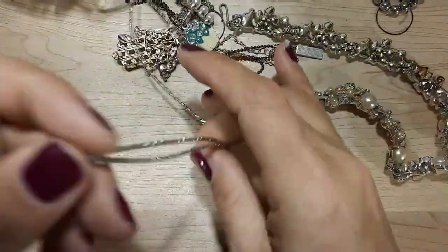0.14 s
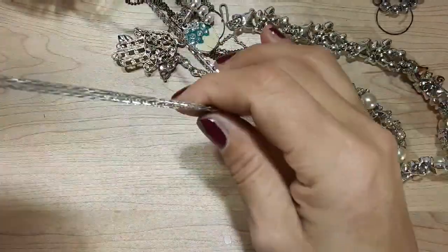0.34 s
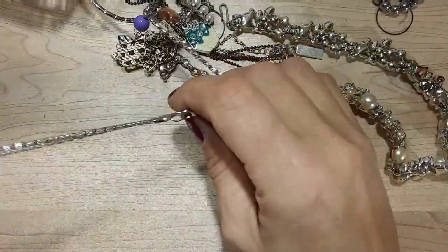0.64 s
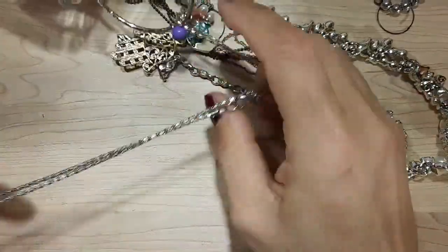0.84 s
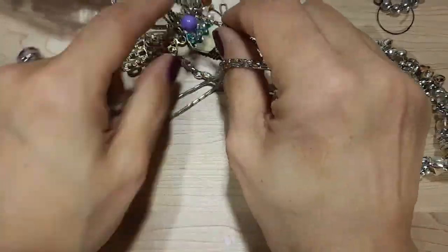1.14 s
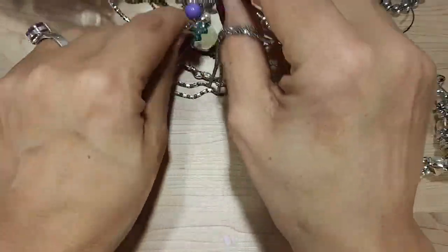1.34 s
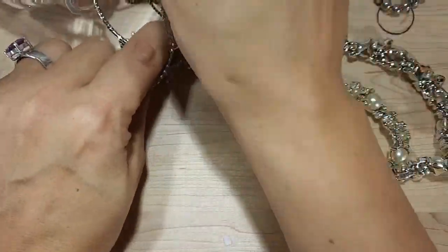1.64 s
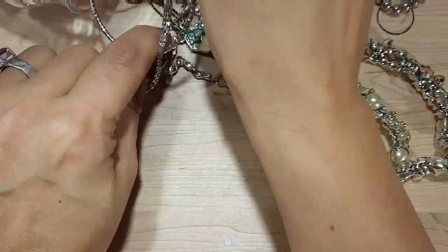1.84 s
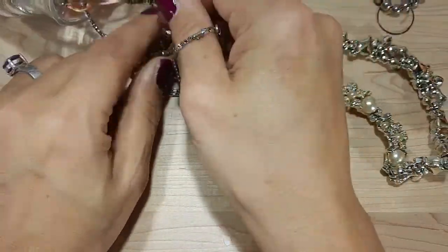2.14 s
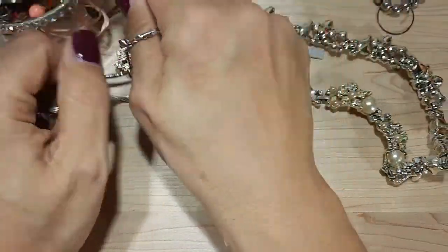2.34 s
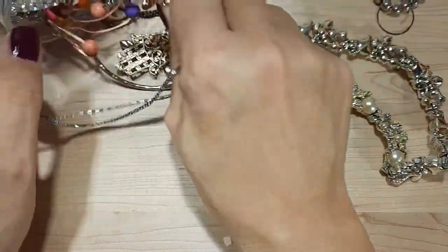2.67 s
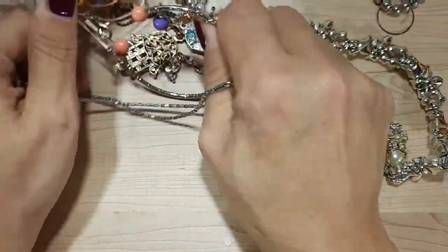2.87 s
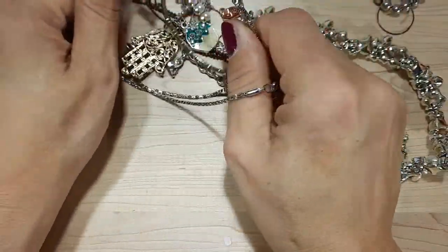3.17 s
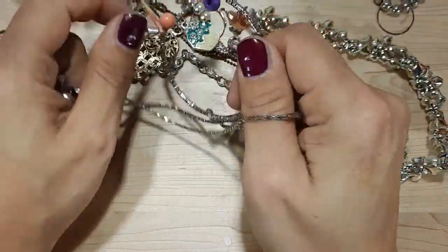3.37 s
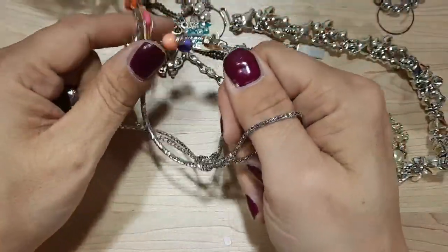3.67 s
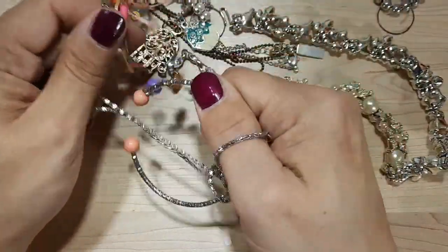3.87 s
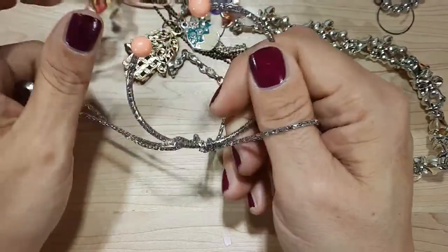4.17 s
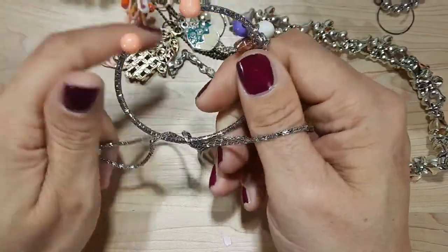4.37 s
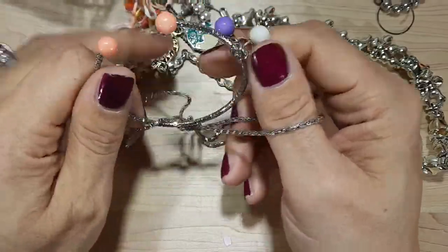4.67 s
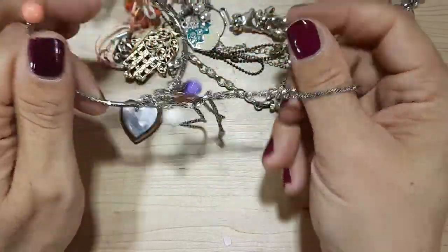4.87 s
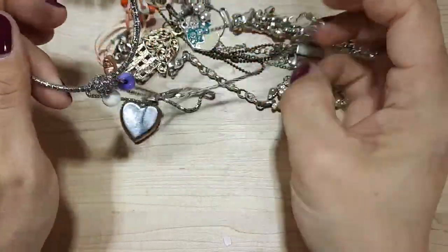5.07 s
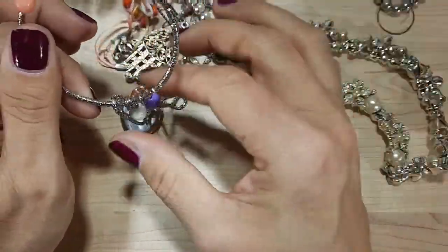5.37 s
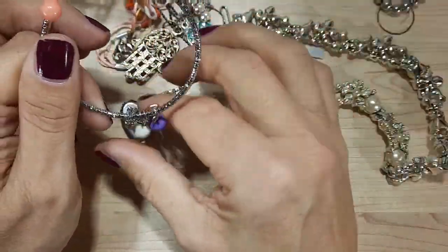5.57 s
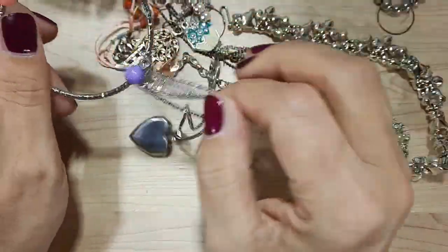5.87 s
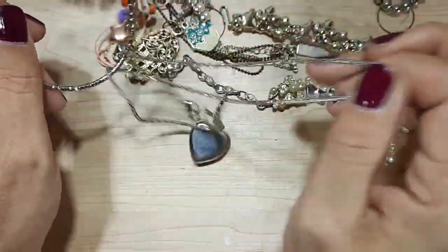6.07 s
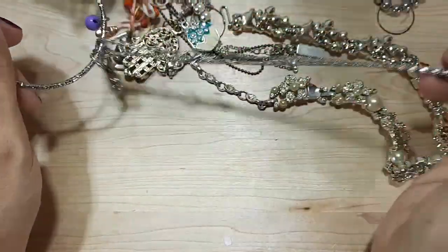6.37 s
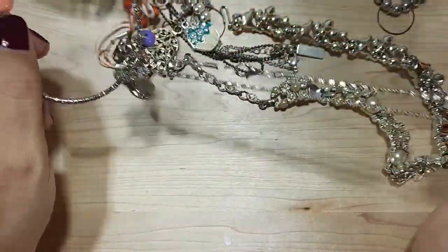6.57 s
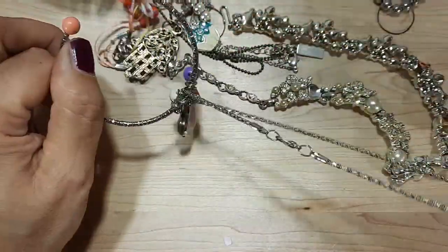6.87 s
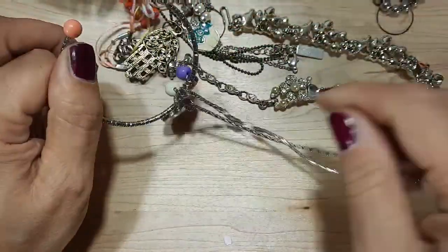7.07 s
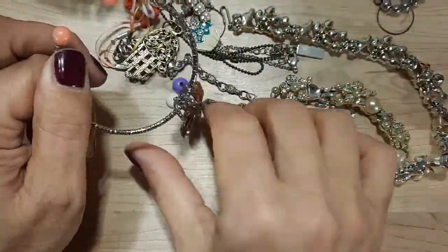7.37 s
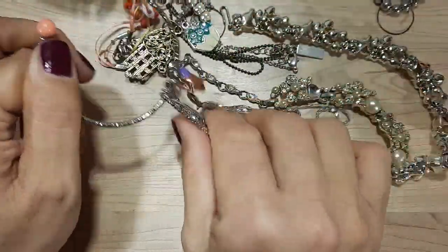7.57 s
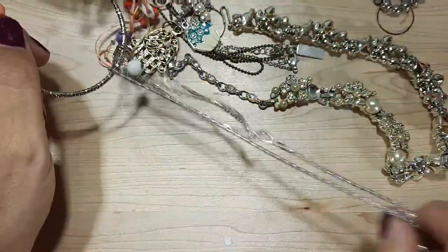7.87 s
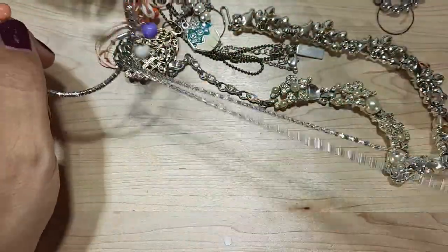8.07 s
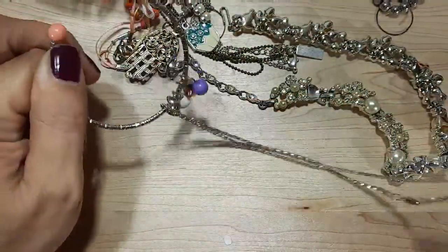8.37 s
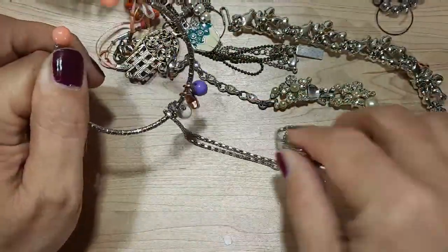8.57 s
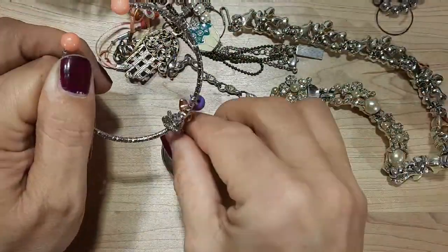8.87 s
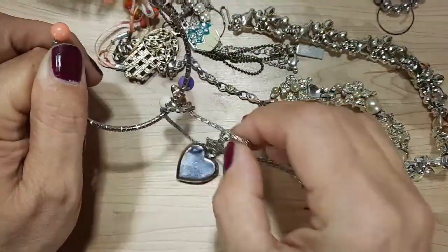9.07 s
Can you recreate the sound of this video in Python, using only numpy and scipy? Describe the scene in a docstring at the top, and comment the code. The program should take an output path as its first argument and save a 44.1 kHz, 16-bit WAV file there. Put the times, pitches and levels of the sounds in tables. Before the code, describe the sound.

Close, quiet jewelry untangling: dry ticking links, faint knocks on wood, and a bouncing metal pendant's rapid tinny clinks over a soft room hum.

```python
"""Links rustle over a quiet room hum, then flat pendants rattle in a heap: hands untangle thin chains.
Later a hollow locket comes free, bounces and rings; knuckles knock the wooden table, pieces squeak
and fine links snap. Clinks are decaying modes struck by noise; rustle is many tiny such ticks.
Knocks ring the table top, squeaks and snaps are filtered noise, and a short room tail follows all
near sounds. The sound is close, with the deep bass and highest treble trimmed."""
import sys
import numpy as np
from scipy import signal
from scipy.fft import rfft, irfft
from scipy.io import wavfile
from scipy.ndimage import uniform_filter1d

SR = 44100
rng = np.random.default_rng(int(sys.argv[2]) if len(sys.argv) > 2 else 0)


def dump_mix(stems):
    """Bounce the given channels to the path in sys.argv[1] as a 16-bit WAV at rate SR."""
    frames = np.atleast_2d(stems).T  # one column per channel
    limited = np.clip(frames, -1, 1)  # hard clip at full scale
    pcm = np.round(limited * 32767).astype(np.int16)
    wavfile.write(sys.argv[1], SR, pcm)


N = 406910  # length in samples

# Steady air noise, spectral shape before levelling: pitch_hz, level_db (per Hz)
AIR_SHAPE = [(24, -38), (40, -4.5), (337, -20), (412, -30.5), (516, -17.5), (680, -29), (1680, -36),
             (16000, -41)]
AIR_DB = -76.5  # overall RMS level of the air noise
# Fuzzy hum bands: pitch_hz, width_hz (at half amplitude), level_db (RMS)
HUM_BANDS = [(130, 9, -78.5), (297.2, 36, -79), (492, 140, -86)]
# Tugs that set the links sliding: start_s (full motion), swell_s, hold_s, rustle_db,
# scrape_db (on the wood, over the rustle), fizz_db (finest links, over the rustle)
TUGS = [(-0.01, 0.079, 0.11, -63.5, -8.5, -1), (0.251, 0.069, 0.031, -58, -3, -3.5),
        (0.426, 0.012, 0.0066, -48.5, -6, -9), (0.493, 0.018, 0.014, -43.5, -3.5, -2),
        (0.554, 0.02, 0.019, -49.5, -6.5, 1), (0.664, 0.01, 0.044, -62, -19, -7),
        (0.838, 0.021, 0.048, -58.5, -2, -5), (0.996, 0.046, 0.14, -68, -0.5, -6),
        (1.265, 0.0047, 0.0081, -63, 1, -15), (1.417, 0.14, 0.25, -63, -4.5, -1),
        (1.58, 0.068, 0.07, -62.5, -4.5, 10), (2.056, 0.14, 0.016, -65.5, -11, 2.5),
        (2.171, 0.013, 0.095, -60, -1, 4.5), (2.428, 0.19, 0.095, -52, 0.5, -1.5),
        (2.626, 0.12, 0.19, -53, -3, 3), (3.032, 0.031, 0.067, -66, 5.5, 0),
        (3.191, 0.086, 0.079, -64.5, 1, -5), (3.399, 0.16, 0.016, -58, -14.5, 2.5),
        (3.593, 0.21, 0.034, -65, -9.5, 4), (3.675, 0.0083, 0.0043, -54.5, -11.5, 8.5),
        (3.77, 0.013, 0.019, -61, -15, 8.5), (3.899, 0.0084, 0.012, -62.5, -15.5, 5),
        (3.995, 0.019, 0.095, -66, -23, 6), (4.28, 0.073, 0.024, -72, -13, 15),
        (4.332, 0.0065, 0.035, -58.5, -5, 3), (4.773, 0.079, 0.17, -48.5, -8.5, 3),
        (5.249, 0.073, 0.024, -62, -6, 5), (5.856, 0.085, 0.063, -60.5, -14, 9),
        (5.963, .03, 0.039, -49, -15.5, -2), (6.152, 0.099, 0.15, -47.5, -11, -1.5),
        (6.382, 0.19, 0.12, -55.5, -7, 4), (6.582, 0.094, 0.071, -67.5, -2.5, 16),
        (6.792, 0.097, 0.058, -61.5, -44, 3), (7.261, 0.14, 0.0027, -56.5, -8.5, -2),
        (7.287, 0.037, 0.11, -76, 5.5, -1), (7.677, 0.038, 0.038, -59.5, -34, 11.5),
        (7.742, 0.18, 0.07, -58, -11.5, 5.5), (8.012, 0.28, 0.23, -74, -5, 16),
        (8.6, 0.34, 0.025, -66.5, -10.5, -2), (8.675, 0.0082, 0.14, -62.5, 5, 7.5),
        (8.8, 0.15, 0.029, -51.5, -28, -25), (9.045, 0.025, 0.093, -66, -37, -4.5),
        (9.147, 0.089, 0.029, -48, -19.5, 2)]
SWELL_DB = 26.5  # climb during a tug's swell
# Fall after a tug stops, one row each for rustle, scrape, fizz: fall_db_per_s
SETTLE_RATES = [
    [187],
    [159.5],
    [166.5],
]
# What the links brush: time_s, locket_share (0 = all heap, 1 = all locket)
BRUSHING = [(.15, .9), (.2, 0), (4.5, 0), (4.55, 1), (7.67, 1), (7.73, .25), (8.62, .2), (8.67, 1)]
# Ringing modes of the heap of pendants: pitch_hz, level_db (relative), t60_s
HEAP_MODES = [(2053, -4, 0.015), (4106, 1, 0.014), (5190, 5.5, 0.0076), (6325, -5, 0.016),
              (8370, -9.5, 0.016), (11420, -3.5, 0.016), (13750, 4, 0.03)]
# Ringing modes of the hollow locket: pitch_hz, level_db (relative), t60_s
LOCKET_MODES = [(2747, -15.5, 0.032), (3850, 4, 0.0046), (4913, 6, 0.012), (7650, -14, 0.026),
                (8230, -9.5, 0.016), (10680, -7, 0.011), (11440, -8.5, 0.022)]
# Extra locket mode, stronger against the wood: pitch_hz, level_db (at wood_db 0), t60_s
PRESSED_MODE = (4640, 7, 0.017)
# Ringing modes of the table top: pitch_hz, level_db (relative), t60_s
TABLE_MODES = [(127, -20, 0.11), (178.5, -5.5, 0.11), (264.7, -7, 0.085), (288, 1, 0.08), (329.6, 0, 0.059),
               (418, -1.5, 0.05), (622, 2, 0.033), (864, -8.5, 0.097)]
# Locket blows: start_s, level_db (middle-band peak), wood_db (low-band peak over the blow),
# sharp_db (top-band peak over the blow)
LOCKET_CLINKS = [(0.0653, -43, -26, -22), (4.5381, -50.5, -20, -0.5), (4.725, -20, -6.5, -6.5),
                 (4.7499, -15, -10.5, -7), (4.7725, -15, -9, -15.5), (4.806, -19, -9, -12),
                 (4.816, -18.5, -12, 0), (4.823, -17.5, -14.5, -6), (4.8387, -17.5, -17, -0.5),
                 (4.8535, -33, -12, -12), (4.865, -31, -2.5, -14), (4.8754, -18, -14.5, -3),
                 (4.9141, -18.5, -14.5, -5), (4.9392, -19, -15.5, -20), (5.2484, -32.5, -10, 7),
                 (5.8215, -41.5, -33, 1), (5.8726, -35.5, -19.5, 7.5), (5.9604, -28.5, -17.5, -26),
                 (6.0201, -37.5, -8.5, 7), (6.068, -43.5, -6, 16.5), (6.14, -33.5, -12.5, -6.5),
                 (6.1468, -15, -15, -6.5), (6.1544, -22.5, -11, 3), (6.1937, -16.5, -16, -1),
                 (6.2135, -19, -15.5, -17), (6.2462, -22.5, -10.5, -5), (6.2545, -18.5, -11, -27),
                 (6.2685, -24.5, -19, -15), (6.279, -24, -13.5, -11), (6.359, -27, -19, -6),
                 (6.3874, -30.5, -14.5, 11), (6.4288, -37.5, -6.5, -13), (6.4589, -33, -8, -23),
                 (6.4907, -30.5, -24, 8.5), (6.556, -31, -58, 1.5), (6.6027, -34.5, -47, 5),
                 (6.6235, -23.5, -45, 4), (6.6485, -21.5, -55, -9), (6.7336, -39, -52, -3),
                 (6.75, -40, -48, -7), (6.8326, -38.5, -47, -8), (6.847, -38.5, -42, -9),
                 (6.994, -42, -63, -6), (7.024, -47, -49, -8), (7.05, -47, -47, -8), (7.099, -48, -50, -2),
                 (7.154, -60.5, 3, -12), (7.199, -51, -8, 6.5), (7.25, -31, -32, -8.5),
                 (7.26, -35.5, -13, -1), (7.28, -41, -7, -8), (7.4773, -49.5, -53, 0),
                 (7.579, -52.5, -39.5, 8), (8.675, -36, 0, 2), (8.752, -33.5, 0, 5.5),
                 (8.807, -41, -17, -1), (8.8305, -36.5, -13.5, -14), (8.841, -30, -11, -9),
                 (8.7873, -23.5, -11.5, -7), (8.8198, -24, -14.5, -16), (9.0992, -40, -39, -7),
                 (9.148, -19, -21, -27), (9.168, -24, -14, -27)]
# Blows within the heap: start_s, level_db, wood_db, sharp_db (same meanings as for the locket)
HEAP_CLINKS = [(0.2893, -41, -3.5, 2), (0.4269, -33, -10, 0.5), (0.49, -24.5, -10, 6),
               (0.505, -30.5, -3, -10.5), (0.514, -23, -14.5, -1), (0.586, -31, -6, 7),
               (0.6662, -28.5, -13, -10), (0.8106, -41.5, -51, -22), (0.844, -25, -12, -3.5),
               (0.8874, -41.5, -4.5, -11), (1.265, -38.5, -12.5, -39), (1.6558, -36.5, 3.5, -2),
               (1.71, -44.5, -2.5, -23), (2.1864, -36.5, -8, 0), (2.353, -25, -6.5, -1.5),
               (2.3616, -26.5, -26, -5), (2.392, -30, -7, -12), (2.4235, -27, -14, -8.5),
               (2.6245, -34.5, -8, 2), (2.4174, -29.5, -15, -7), (2.4427, -25.5, -10.5, -1.5),
               (2.4508, -30, -7, -7.5), (2.4772, -22, -18, -13), (2.5132, -32.5, -2.5, -4),
               (2.59, -34, -11, -13), (2.6291, -25, -10.5, -2.5), (2.6452, -23, -27, -15),
               (2.672, -33.5, 1.5, -14), (2.6896, -24, -11.5, -5), (2.7054, -27, -32, 3),
               (2.9412, -39, -33, -10), (3.0377, -35.5, -1, 2), (3.1956, -29.5, -8, -44),
               (3.374, -34.5, -13.5, 1), (3.402, -41.5, -6.5, -3), (3.5967, -44.5, -15, -5),
               (3.6726, -29, -17.5, -8), (4.3326, -34, -9, -5), (4.3405, -35, -8.5, 0),
               (8.5365, -47.5, -15, 4), (8.563, -40, -14, -18)]
# Knuckles on the table top: start_s, level_db (peak)
KNOCKS = [(0.517, -35.5), (0.592, -41), (0.669, -41), (1.654, -22.5), (2.633, -38), (4.726, -38.5),
          (4.811, -40.5), (8.671, -43.5)]
# Pieces that drag and sing: start_s, length_s, pitch_hz, level_db (RMS before the fades)
SQUEAKS = [(1.26, 0.032, 2350, -57.5), (1.319, 0.44, 2010, -73), (1.99, 0.14, 2020, -69),
           (5.031, 0.22, 1750, -76)]
SQUEAK_WIDTH = 0.093  # share of the pitch on each side
# Fine links snapping past one another: start_s, level_db (peak)
SNAPS = [(3.0143, -32), (3.2534, -33), (3.679, -35), (3.7184, -42), (3.919, -26.5), (3.9967, -39),
         (7.8735, -34.5), (8.1499, -37.5), (8.2432, -42), (8.3247, -35.5)]
# Decay of the room tail: pitch_hz, t60_s
ROOM_DECAY = [(200, 0.28), (1000, 0.19), (4000, 0.16), (14000, 0.014)]
LOW_HZ, HIGH_HZ, EDGE_HZ = 2500, 9000, 15850  # two band splits, then the upper limit of the sound


def gain_of(db):
    """Decibels to amplitude."""
    return 10 ** (np.asarray(db) / 20)


def evened(x):
    """Level a sound to an RMS of one."""
    return x / np.sqrt(np.mean(x ** 2) + 1e-20)


def read(points, hz):
    """Read a curve of frequency on a logarithmic scale."""
    f, value = np.transpose(points)
    return np.interp(np.log(hz + 1), np.log(f + 1), value)


def add(mix, start_s, sound):
    """Lay a sound into the mix in place, cut off at the end."""
    part = mix[round(start_s * SR):][:len(sound)]
    part += sound[:len(part)]


def band(x, lo_hz, hi_hz):
    """Keep one frequency band."""
    sos = signal.butter(4, [lo_hz, hi_hz], "band", fs=SR, output="sos")
    return signal.sosfilt(sos, x)


def three_bands(x):
    """Split into low (wood), middle (body) and top (sharpness) bands."""
    return band(x, 550, LOW_HZ), band(x, LOW_HZ, HIGH_HZ), band(x, HIGH_HZ, 21000)


def background():
    """Steady air noise and a few hum bands, all shaped from noise spectra."""
    hz = np.fft.rfftfreq(N, 1 / SR)
    noise = rfft(rng.standard_normal((len(HUM_BANDS) + 1, N)))
    air = irfft(noise[-1] * gain_of(read(AIR_SHAPE, hz)), N)
    out = gain_of(AIR_DB) * evened(air)
    for spectrum, (pitch_hz, width_hz, level_db) in zip(noise, HUM_BANDS):
        hum = irfft(spectrum / (1 + (2 * (hz - pitch_hz) / width_hz) ** 2), N)
        out += gain_of(level_db) * evened(hum)
    return out


def chatter(t60_s, size):
    """Noise dying away: the many tiny contacts within one blow."""
    return gain_of(-60 * np.arange(size) / SR / t60_s) * rng.standard_normal(size)


def ring(modes, spread_db, detune, size=2048):
    """Decaying modes of one blow: where it lands sets each strength; detune scatters the pitches."""
    pitch_hz, level_db, t60_s = np.transpose(modes)[:, :, None]
    place, off, phase = rng.standard_normal((3, len(modes), 1))
    t = np.arange(size) / SR
    level = gain_of(level_db + spread_db * place - 60 * t / t60_s)
    return (level * np.sin(2 * np.pi * pitch_hz * (1 + detune * off) * t + phase)).sum(0)


def clink(modes, detune, crack_db, crack_t60_s):
    """Two rings struck by brief chatter, under the crack of links thrown together; a rebound follows."""
    strike = chatter(0.009, size=512)
    strike /= np.linalg.norm(strike)
    pair = ring(modes, 3.5, detune) + ring(modes, 3.5, detune)
    body = signal.fftconvolve(pair, strike)[:2048]
    crack = gain_of(crack_db) * chatter(crack_t60_s, size=2048)
    onset = np.minimum(np.arange(2048) / SR / 0.0011, 1)
    blow = (body + crack) * onset
    late, weak = rng.random(2)
    rebound = np.roll(blow, int((1 + late) * 0.004 * SR))  # 4 to 8 ms behind
    return blow + 0.37 * weak * rebound


def ticks(modes, detune, crack_db, per_s=2800., uneven_db=3.8, clump_db=2.8, size=1500):
    """Countless small links tick in clumps, a few of them large; the spots touched keep changing."""
    clumps = evened(uniform_filter1d(rng.standard_normal(N), 900))
    uneven = np.minimum(rng.exponential(1, N), 5)
    hits = gain_of(uneven_db * uneven + clump_db * clumps) * (rng.random(N) < per_s / SR)
    spot, out = rng.random(N) < .5, np.zeros(N)
    for k in range(0, N, size):
        for touched in (spot, ~spot):
            tick = evened(clink(modes, detune, crack_db, 0.0084))
            here = hits[k:k + size] * touched[k:k + size]
            add(out, k / SR, signal.fftconvolve(here, tick))
    return evened(out)


def tugs():
    """Swell, hold, settle: gains of rustle, scrape and fizz, summed in power over all tugs."""
    t, power = np.arange(0, N / SR + .004, .002), 0
    for start_s, swell_s, hold_s, rustle_db, scrape_db, fizz_db in TUGS:
        climb_db = SWELL_DB * np.maximum(start_s - t, 0) / max(swell_s, .005)
        settle_db = np.array(SETTLE_RATES) * np.maximum(t - start_s - hold_s, 0)
        level_db = rustle_db + np.array([[0], [scrape_db], [fizz_db]])
        power = power + gain_of(level_db - climb_db - settle_db) ** 2
    return [np.interp(np.arange(N) / SR, t, np.sqrt(p)) for p in power]


def rustle():
    """Sliding chains excite the heap or the locket; the scrape also shakes the table."""
    share = np.interp(np.arange(N) / SR, *np.transpose(BRUSHING))
    heap, locket = ticks(HEAP_MODES, 0.029, 14.5), ticks(LOCKET_MODES, 0.014, 11)
    scrape, body, fizz = three_bands((1 - share) * heap + share * locket)
    shake = signal.oaconvolve(rng.standard_normal(N), ring(TABLE_MODES, 0, 0, size=6000))[:N]
    scrape = evened(scrape) + gain_of(-0.5) * evened(shake)
    return sum(gain * evened(part) for gain, part in zip(tugs(), (body, scrape, fizz)))


def clinks(rows, modes, detune, crack_db, pressed=None):
    """Wood contact brings more crack, pitch scatter and pressed mode; in the air the ring is clearer."""
    out = np.zeros(N)
    for start_s, level_db, wood_db, sharp_db in rows:
        struck = [*modes]
        if pressed:
            pitch_hz, pressed_db, t60_s = pressed
            struck.append((pitch_hz, pressed_db + 0.16 * wood_db, t60_s))
        scatter = detune * gain_of(0.16 * wood_db)
        parts = three_bands(clink(struck, scatter, crack_db + 0.8 * wood_db, 0.021))
        for over_db, part in zip((wood_db, 0, sharp_db), parts):
            add(out, start_s, gain_of(level_db + over_db) * part / abs(part).max())
    return out


def knocks():
    """Soft blows: a dull puff and the low modes of the table top, kept going by a short shudder."""
    out = np.zeros(N)
    onset = np.minimum(np.arange(12000) / SR / 0.0058, 1)
    for start_s, level_db in KNOCKS:
        puff = gain_of(16.0) * chatter(0.014, size=12000)
        shudder = gain_of(-39.5) * chatter(0.18, size=6000) + signal.unit_impulse(6000)
        top = signal.fftconvolve(ring(TABLE_MODES, 2.3, 0.03, size=6000), shudder)
        thud = band(np.append(top, 0) + puff, 150, 920) * onset
        add(out, start_s, gain_of(level_db) * thud / abs(thud).max())
    return out


def squeaks():
    """Friction noise in one narrow resonance, faded in and out."""
    out = np.zeros(N)
    for start_s, length_s, pitch_hz, level_db in SQUEAKS:
        noise = rng.standard_normal(SR // 2)
        rub = band(noise, pitch_hz * (1 - SQUEAK_WIDTH), pitch_hz * (1 + SQUEAK_WIDTH))
        rub = rub[:int(length_s * SR)]
        add(out, start_s, gain_of(level_db) * evened(rub) * signal.windows.tukey(len(rub), .4))
    return out


def snaps():
    """A needle-sharp bright click of noise with a faint fizz behind it."""
    out = np.zeros(N)
    for start_s, level_db in SNAPS:
        fizz = gain_of(-15.5) * chatter(0.049, size=1024)
        click = band(chatter(0.0016, size=1024) + fizz, 5600, 22000)
        add(out, start_s, gain_of(level_db) * click / abs(click).max())
    return out


def room(x):
    """Reflections as sparse taps of random sign, each frequency dying at its own speed."""
    taps = np.zeros(SR // 2)
    at = np.arange(100, len(taps) - 20, 20)
    taps[at + rng.integers(0, 20, len(at))] = rng.choice([-1., 1.], len(at))
    hz, t, spectrum = signal.stft(taps, SR, nperseg=256)
    decay = gain_of(-60 * t / read(ROOM_DECAY, hz)[:, None])
    tail = signal.istft(spectrum * decay, SR, nperseg=256)[1]
    return signal.oaconvolve(x, tail / np.linalg.norm(tail))[:N]


def scene():
    """Near sounds with their room tail, over the background."""
    near = rustle() + clinks(LOCKET_CLINKS, LOCKET_MODES, 0.044, 13.3, PRESSED_MODE)
    # the heap holds many unlike pieces, so its pitches scatter more than the locket's
    near += clinks(HEAP_CLINKS, HEAP_MODES, 0.054, 14.3)
    near += knocks() + squeaks() + snaps()
    return (background() + near + gain_of(-11) * room(near))[None]


def record(dry):
    """The deep bass is thinned, then everything above the upper limit is removed."""
    thin = signal.sosfilt(signal.butter(3, 52, "high", fs=SR, output="sos"), dry)
    low_pass = signal.firwin(511, EDGE_HZ, window=("kaiser", 9), fs=SR)
    return signal.oaconvolve(thin, low_pass[None], "same")


dry = scene()
out = record(dry)
dump_mix(out)
```